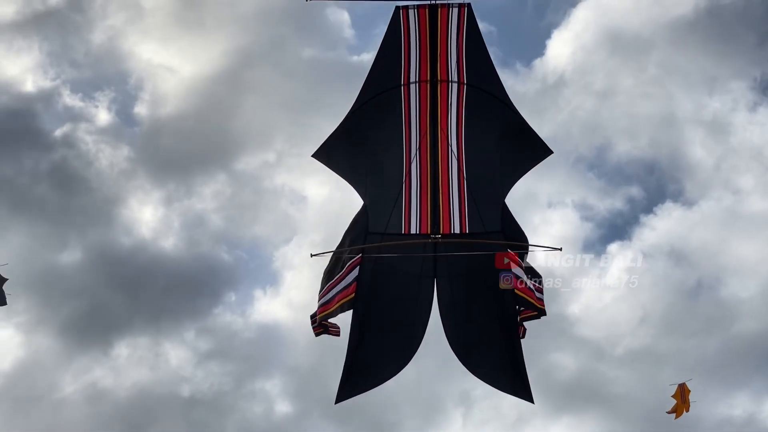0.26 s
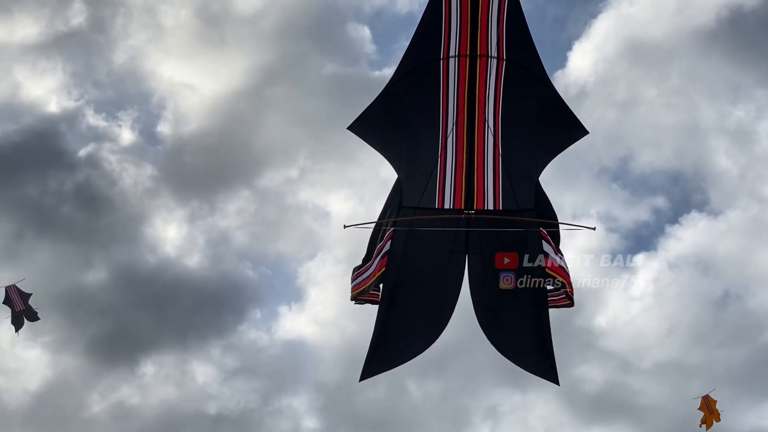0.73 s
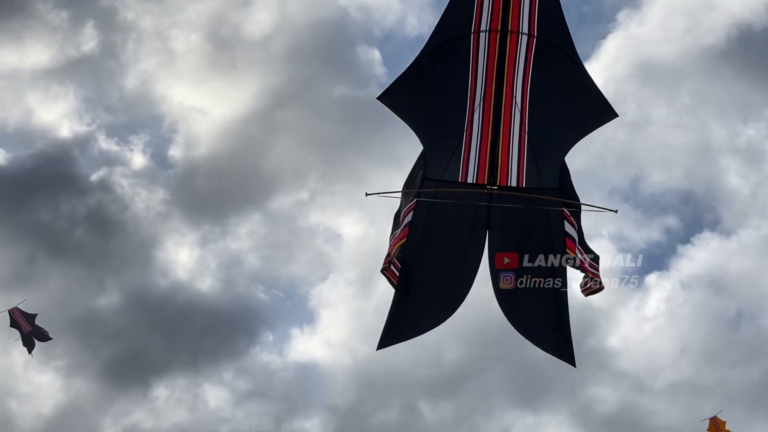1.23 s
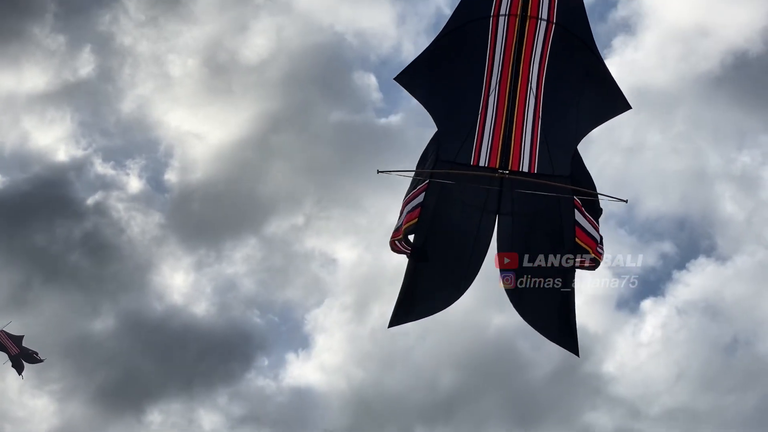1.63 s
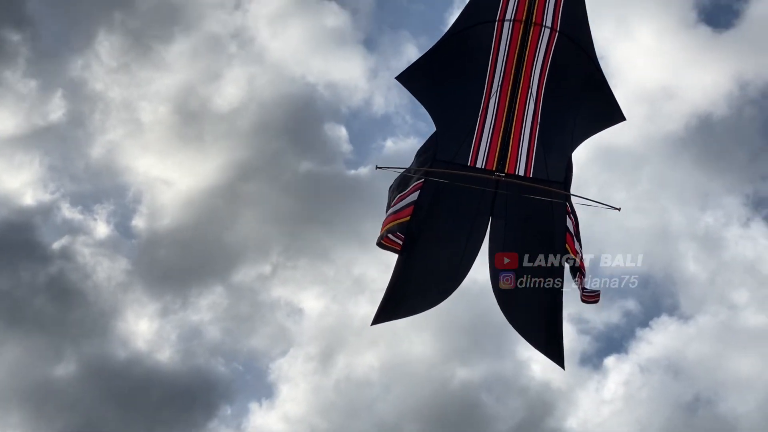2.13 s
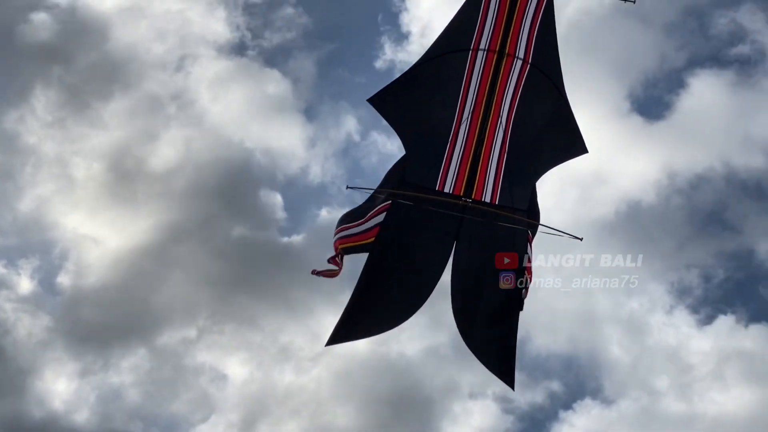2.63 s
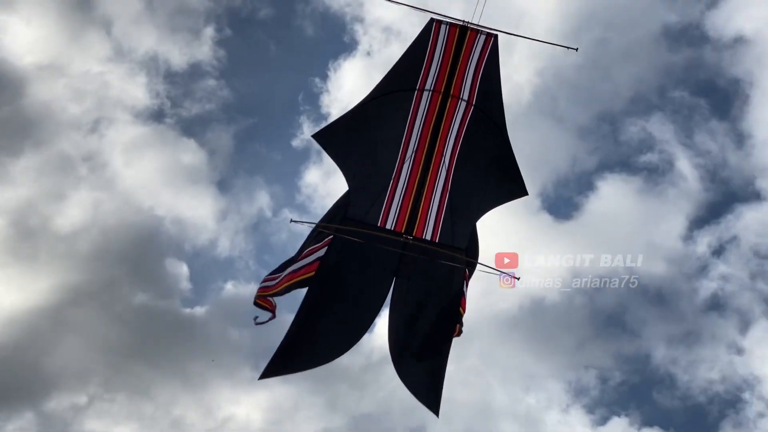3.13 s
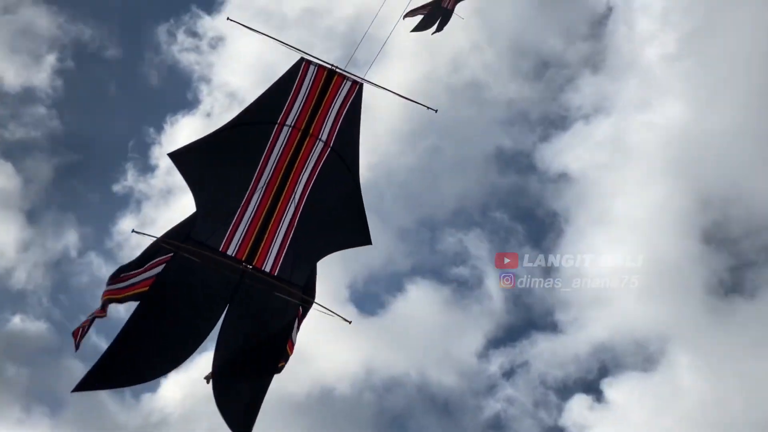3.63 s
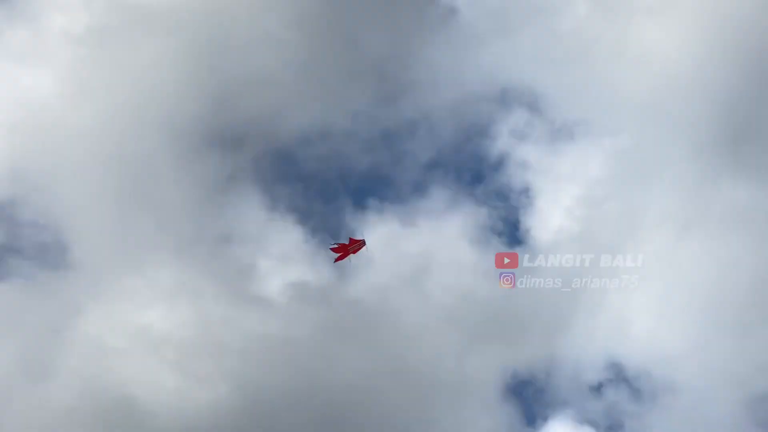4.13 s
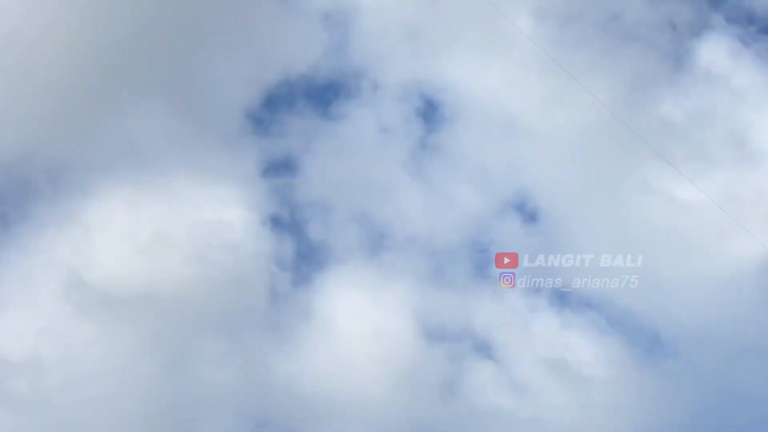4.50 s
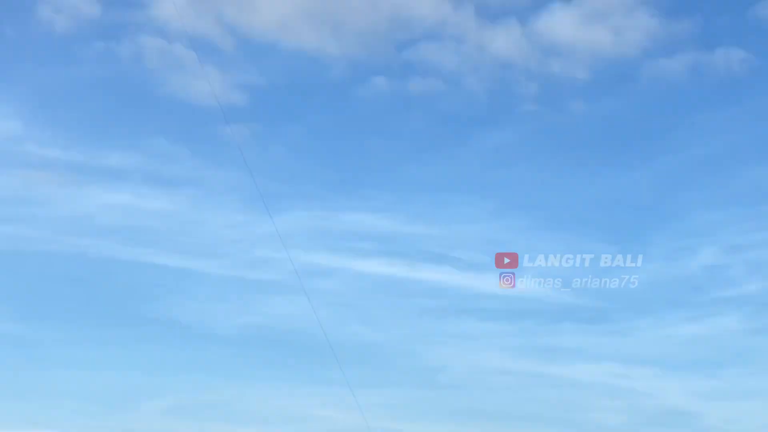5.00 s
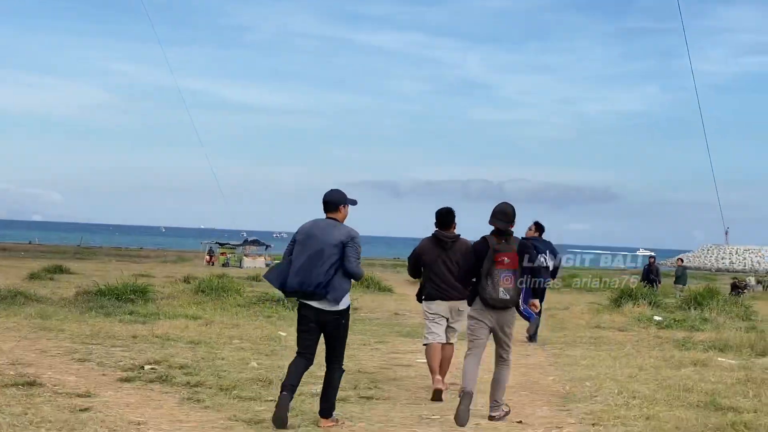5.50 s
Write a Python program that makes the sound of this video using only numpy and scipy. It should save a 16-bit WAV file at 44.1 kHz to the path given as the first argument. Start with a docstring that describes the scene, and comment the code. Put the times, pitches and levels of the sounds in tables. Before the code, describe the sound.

Strong wind rushes across an open field and buffets the microphone, with a few brief low hums in the rumble. Overhead, a large kite's two vibrating ribbons drone with a fast flutter, swelling, rising in pitch, then holding. Its cloth adds soft rustles, flaps and small crisp cracks, busiest in the first half. Near the end the higher buzz drops away as a lower, faster throb and a faint, distant rising tone appear.

```python
"""Two ribbon-strung bows on a large kite, overhead in strong wind. Each ribbon swings about 14 times
a second and sheds a short vortex tone on every forward and return stroke; the bows drift against
each other. The sail rustles, flaps, snaps and crinkles. Wind rumbles and rushes over the field, with
brief low hums in it. A low throb and a thin far tone come up near the end."""
import sys
import numpy as np
from scipy import signal
from scipy.fft import rfft, irfft, next_fast_len
from scipy.io import wavfile
from scipy.ndimage import uniform_filter1d, map_coordinates

SR = 44100
rng = np.random.default_rng(int(sys.argv[2]) if len(sys.argv) > 2 else 0)


def int16_out(signal):
    """Quantize to a 16-bit WAV file."""
    q = np.round(np.clip(np.atleast_2d(signal).T, -1, 1) * 32767)
    wavfile.write(sys.argv[1], SR, q.astype(np.int16))


N = 253569
TIME_S = np.arange(N) / SR

FRONT_SWING_HZ, REAR_SWING_HZ = 14.19, 13.94
# Forward strokes. Each row: time in seconds, shed tone in Hz, relative level in dB.
FRONT_STROKES = [(0, 300.7, -19), (.41, 283, -18), (.82, 298, -15.5), (1.23, 309.7, -13.5),
                 (1.65, 296, -13.5), (1.9, 351, -13), (2.1, 383.5, -14), (2.36, 388.7, -15),
                 (2.65, 381, -15.5), (3.1, 381, -15.5), (3.7, 367, -15.5), (4.4, 364.4, -16),
                 (4.75, 374, -19), (5.15, 366, -28), (5.75, 331, -30)]
REAR_STROKES = [(0, 208.4, -20.5), (1.2, 216.4, -17), (1.9, 222, -19.5), (2.4, 209.7, -22.5),
                (3, 236.4, -24.5), (4.2, 246.6, -22), (4.8, 265, -25), (5.75, 275, -23)]
# Lag of the shedding behind a steady swing. Each row: time in seconds, lag in ms.
FRONT_LAG = [(0, 34.3), (.5, 34.4), (.8, 35.7), (1.1, 35.9), (1.6, 33.2), (2.3, 33.4), (2.9, 31.7),
             (3.35, 31.1), (4.4, 33.2), (5.75, 34.4)]
REAR_LAG = [(0, 49.5), (1.15, 54.2), (2.3, 54.2), (3.3, 50.4), (4.2, 53.5), (5, 52.5), (5.75, 49.5)]
# Front ribbon's bursts. Each row: time, forward width, return delay, all in seconds.
FRONT_BURSTS = [(0, 0.0035, -0.0013), (1.7, 0.0042, -0.00097), (2.0, 0.0047, 0.0025), (2.6, 0.006, -.001),
                (5.75, 0.0065, 0.0021)]
def bows():
    """Two swinging ribbons. Forward strokes are faster than returns, so higher and louder."""
    width_s, return_delay_s = curves(FRONT_BURSTS, swing_starts(FRONT_SWING_HZ))
    front_returns = return_strokes(FRONT_STROKES, start_hz=282, pitch_share=.49, mean_db=-20.5)
    rear_returns = return_strokes(REAR_STROKES, start_hz=209, pitch_share=.7, mean_db=-24.5)
    forward, forward_swell = strokes(FRONT_STROKES, FRONT_SWING_HZ, FRONT_LAG, delay_s=.0015,
                                     width_s=width_s, glide_per_s=7.1, bright_db=2, slip_cycles=.04)
    back, back_swell = strokes(front_returns, FRONT_SWING_HZ, FRONT_LAG, delay_s=return_delay_s,
                               width_s=.0056, glide_per_s=16, bright_db=-9, slip_cycles=.17,
                               offset_swings=.54)
    rear_forward, _ = strokes(REAR_STROKES, REAR_SWING_HZ, REAR_LAG, delay_s=.00063,
                              width_s=.0063, glide_per_s=1.3, bright_db=3.5, slip_cycles=.0045)
    rear_back, _ = strokes(rear_returns, REAR_SWING_HZ, REAR_LAG, delay_s=.00072, width_s=.004,
                           glide_per_s=.82, bright_db=-10, slip_cycles=.012, offset_swings=-.5)
    front = (forward - back) * stereo_gain(.3, -.3)  # the return sheds in the opposite sense
    rear = (rear_forward + rear_back) * stereo_gain(-.3, .3)
    return front + rear + torn_air(forward_swell, back_swell)


def swing_starts(swing_hz):
    """Column of swing start times in seconds."""
    return np.arange(int(N / SR * swing_hz) + 2)[:, None] / swing_hz


def return_strokes(forward, start_hz, pitch_share, mean_db):
    """Return stroke rows, following the forward stroke's changes of pitch and level."""
    s, hz, db = np.transpose(forward)
    return np.transpose([s, start_hz + pitch_share * (hz - hz[0]), mean_db + db - db.mean()])


PITCH_SCATTER, LEVEL_SCATTER_DB, TIMING_SCATTER_S = .008, .7, .001
TWELFTH_DB, OVERTONE_FADE_DB_PER_S = -15.5, 903
# Edge of the ribbons' sound. Each row: time in seconds, relative octave and rasp levels in dB.
RIBBON_BITE = [(0, -28.5, -43.5), (.8, -19.5, -56), (1.1, -13, -48), (1.3, -14, -47.5), (1.8, -20, -51.5),
               (2.0, -14.5, -45), (2.35, -18, -46), (2.6, -22, -49.5), (4.3, -25, -52), (5.75, -27, -54.5)]
def strokes(rows, swing_hz, lag, delay_s, width_s, glide_per_s, bright_db, slip_cycles, offset_swings=0):
    """One vortex burst a swing, swelling and gliding with ribbon speed. Returns sound and envelope."""
    start_s = swing_starts(swing_hz)
    hz, db = curves(rows, start_s)
    octave_db, _ = curves(RIBBON_BITE, start_s)
    centre_s = start_s + curves(lag, start_s)[0] / 1000 + offset_swings / swing_hz
    timing, pitch, size, slip, colour_db = rng.standard_normal((len(start_s), 5, 1)).transpose(1, 0, 2)
    t = np.arange(-1500, 1500) / SR
    stroke_hz = hz * (1 + PITCH_SCATTER * pitch)
    phase = 2 * np.pi * (stroke_hz * (t + glide_per_s * t ** 2 / 2) + slip_cycles * slip)
    shape = np.hanning(len(t)) * gaussian(t - delay_s - TIMING_SCATTER_S * timing, width_s)
    swell = amp(LEVEL_SCATTER_DB * size) * shape
    flicker = unit(signal.lfilter(*signal.butter(4, 250, fs=SR), rng.standard_normal(phase.shape)))
    overtones = np.sin(2 * phase + 1) + amp(TWELFTH_DB) * np.sin(3 * phase + 2)
    overtone_db = octave_db + bright_db + colour_db + 2 * np.tanh(flicker) - OVERTONE_FADE_DB_PER_S * t
    tone = np.sin(phase) + amp(overtone_db) * overtones
    onset_s = centre_s[:, 0] + t[0]
    return place(amp(db + 2) * swell * tone, onset_s), place(swell, onset_s)


TEAR_DB, TEAR_LEAD_S = -25, .0026
# Torn air. Each row: frequency in Hz, relative density in dB.
TEAR_SPECTRUM = [(380, -39.5), (520, -2), (760, 1.5), (950, -8), (1200, -29), (2000, -120)]
def torn_air(forward_swell, back_swell):
    """The front ribbon tears the air: a rasp going forward, a lower noise just ahead of each tone."""
    _, rasp_db = curves(RIBBON_BITE, TIME_S)
    _, stroke_db = curves(FRONT_STROKES, TIME_S)
    rasp = amp(rasp_db) * forward_swell ** 1.5 * noise(RUSTLE_SPECTRUM, patchy_db=4)
    early_swell = np.interp(TIME_S + TEAR_LEAD_S, TIME_S, forward_swell + .55 * back_swell)
    return rasp + amp(stroke_db + TEAR_DB) * early_swell * noise(TEAR_SPECTRUM, patchy_db=3.5)


RUSTLE_DB, HISS_DB = -50, -65
# Cloth noise; the rustle also colours the ribbon's rasp. Each row: Hz, relative density in dB.
RUSTLE_SPECTRUM = [(590, -20.5), (1000, 4.5), (1240, 4), (1660, 4.5), (2290, 1), (3050, -12.5), (3960, -41),
                   (6710, -120)]
HISS_SPECTRUM = [(2200, -21), (3000, -4.5), (3400, -2.5), (5000, -8), (6500, -16.5), (7800, -25),
                 (8400, -43.5), (9000, -78.5), (17000, -120)]
# Gusts on the sail. Each row: centre in seconds, width in seconds, rustle boost in dB.
SAIL_GUSTS = [(0.98, 0.02, 4.5), (1.233, 0.032, 9), (1.396, .03, 3.5), (1.998, 0.05, 3), (2.201, 0.03, 3.5),
              (2.31, 0.015, 6.5), (2.383, 0.016, 7.5), (2.484, 0.01, 5), (2.676, 0.0237, 8),
              (2.962, .03, 5.5), (4.299, 0.18, 2), (5.062, 0.063, 4)]
def sail_rustle():
    """The cloth rustles and hisses in shared quick flurries, and swells in short gusts."""
    gust_db = sum(db * gaussian(TIME_S - s, width_s) for s, width_s, db in SAIL_GUSTS)
    flurry_db = .5 * wobble(25) + 1.3 * wobble(160)
    rustle = unit(amp(flurry_db) * noise(RUSTLE_SPECTRUM, patchy_db=1.5))
    hiss = unit(amp(.76 * flurry_db) * noise(HISS_SPECTRUM, patchy_db=1.5))
    return amp(RUSTLE_DB + gust_db) * rustle + amp(HISS_DB + .59 * gust_db) * hiss


FLAP_HZ, FLAP_RISE_S, FLAP_T60_S = 1700, .002, .04
# Side cloth flaps. Each row: time in seconds, relative level in dB.
CLOTH_FLAPS = [(.143, -35.5), (0.21, -39), (0.327, -39), (.52, -35.5), (.693, -31.5), (0.9658, -31),
               (1.232, -29), (1.286, -33), (1.3872, -35), (1.5536, -33), (1.8903, -23), (1.9784, -33),
               (2.128, -41.5), (2.2855, -32.5), (2.366, -35), (2.484, -31.5), (2.6698, -33.5), (2.701, -37),
               (2.736, -32.5), (2.9437, -25), (3.0459, -32.5), (3.7247, -38), (4.528, -32.5), (5.0502, -41),
               (5.0926, -36)]
def sail_flaps():
    """The side cloth whips over: soft puffs of rustle, partly different in each channel."""
    puffs = np.zeros((2, N))
    t = np.arange(SR // 8) / SR
    for s, db in CLOTH_FLAPS:
        envelope = amp(db - 3.5 - 60 * t / FLAP_T60_S) * (1 - np.exp(-t / FLAP_RISE_S))
        common = band(FLAP_HZ, q=.91, size=len(t))
        for channel in puffs:
            puff = common + .6 * band(FLAP_HZ, q=.82, size=len(t))
            channel += place([envelope * puff], [s - FLAP_RISE_S])
    return filtered(puffs, lambda hz: lowpass(hz, 3000, 6) / (1 + (650 / (hz + 1)) ** 4))


TICKS_PER_S, TICK_DB, TICK_HZ, TICK_T60_S = 9, -69, 4800, .015
CRACK_RISE_S, SNAP_TOP_HZ = .0011, 10500
# Short cracks. Each row: start in seconds, relative level in dB, band centre in Hz, T60 in seconds.
EDGE_SNAPS = [(.111, -58, 5800, .015), (.21, -50.5, 4200, 0.016), (.418, -46.5, 3000, 0.033),
              (.535, -46.5, 3000, 0.02), (.536, -65, 6000, .02), (.596, -53, 3580, 0.017),
              (.637, -55, 5960, .02), (.834, -55, 5030, 0.066), (.874, -46, 5770, 0.011),
              (.889, -42, 5900, 0.008), (1.025, -56, 6040, 0.014), (1.188, -61, 5050, 0.015),
              (1.197, -47, 2500, 0.019), (1.242, -42, 5850, 0.023), (1.291, -51, 5960, 0.014),
              (1.33, -52.5, 4880, 0.023), (1.413, -50, 2770, 0.013), (1.506, -53.5, 5300, 0.026),
              (1.878, -54, 9100, 0.015), (1.797, -37.5, 5860, 0.024), (1.885, -50, 2300, .012),
              (1.888, -36, 5400, 0.0089), (1.892, -44.5, 6450, 0.038), (1.92, -45.5, 6300, 0.016),
              (2.699, -52, 5200, 0.023), (3.103, -43, 4400, 0.017), (3.182, -53.5, 5170, .02),
              (3.259, -55, 5170, .03), (3.771, -55, 5000, .02), (4.11, -53, 2400, 0.025),
              (4.17, -45.5, 5280, 0.023), (4.17, -49, 9500, .015), (4.434, -55, 4670, 0.042),
              (4.522, -51, 5430, 0.018), (4.652, -43, 3300, 0.014)]
TOP_SIZZLES = [(.906, -63, 14200, 0.047), (1.023, -71, 13800, .03), (1.051, -69, 14400, .03),
               (1.074, -66, 14300, .035), (1.132, -71, 13500, .03), (1.243, -70, 13300, .04),
               (1.3, -72, 14000, .03), (1.505, -64, 14500, .03), (1.562, -76, 14900, 0.053),
               (1.797, -61, 12800, .025), (1.877, -70, 12500, 0.017), (1.892, -64, 12800, .03),
               (2.523, -65, 14900, .07), (2.563, -64, 14900, 0.054), (2.602, -62, 14800, 0.044),
               (2.63, -63, 14400, .03), (2.67, -68, 13100, 0.037), (2.692, -67, 15300, .05),
               (2.778, -64, 13000, 0.025), (4.169, -73, 12500, 0.029)]
LEFT_CHINKS = [(2.52, -56, 7900, 0.083), (2.523, -69, 8800, .04), (2.603, -52, 8850, 0.024),
               (2.668, -62, 7950, 0.055), (2.777, -64, 9940, .02)]
def sail_snaps():
    """A loose edge cracks taut, among random ticks, crisp sizzles and thin chinks on the left."""
    draws = rng.random((int(TICKS_PER_S * N / SR), 3))
    ticks = [(when * N / SR, TICK_DB + 12 * size, TICK_HZ * (.73 + .84 * pitch), TICK_T60_S)
             for when, size, pitch in draws]
    cloth = cracks(EDGE_SNAPS + ticks, q=3, body_db=2, body_hz=3200)
    cloth = filtered(cloth, lambda hz: lowpass(hz, SNAP_TOP_HZ, 6))
    sizzles = cracks(TOP_SIZZLES, q=20, body_db=-4, body_hz=9800)
    chinks = cracks(LEFT_CHINKS, q=14, body_db=-23, body_hz=11000)
    return cloth + sizzles + chinks * stereo_gain(4, -12)


def cracks(rows, q, body_db, body_hz):
    """Decaying noise in a band at each row's pitch, plus a broad body."""
    out = np.zeros(N)
    t = np.arange(SR // 10) / SR
    for s, db, hz, t60_s in rows:
        envelope = amp(-60 * t / t60_s) * (1 - np.exp(-t / CRACK_RISE_S))
        burst = band(hz, q, size=len(t)) + amp(body_db) * band(body_hz, q=.86, size=len(t))
        out += place([amp(db - 9) * envelope / envelope.max() * burst], [s])
    return out


# Crinkle colour. Each row: frequency in Hz, relative density in dB.
CRINKLE_SPECTRUM = [(8000, -59), (8800, -0.5), (9800, 2), (11000, -4.5), (11500, -19), (12600, -27),
                    (13000, -61), (14000, -120)]
# Crinkle flurries. Each row: time in seconds, level in dB.
CRINKLE_LEVELS = [(0, -100), (.8, -98), (1, -85.5), (1.35, -88), (1.6, -98.5), (1.93, -80), (2.05, -100),
                  (2.5, -99), (2.63, -85), (2.75, -86), (2.9, -102), (4.1, -93), (5.75, -96.5)]
def crinkle():
    """Faint, spiky crinkling in the top treble."""
    level_db = curves(CRINKLE_LEVELS, TIME_S)[0]
    spikes = amp(2.5 * wobble(30) + 2.5 * wobble(200))
    return amp(level_db) * unit(spikes * noise(CRINKLE_SPECTRUM, patchy_db=3))


# Wind strength. Each row: time in seconds, rumble in dB, rush in dB.
WIND_LEVELS = [(0, -33.5, -20.5), (.6, -29.5, -25.5), (.95, -26, -23), (1.35, -23.5, -23.5),
               (1.41, -35, -27.5), (1.5, -35, -23), (1.56, -26.5, -25.5), (2.05, -30.5, -22.5),
               (2.25, -31, -24), (2.5, -32.5, -23), (2.74, -22.5, -24.5), (2.92, -28, -26),
               (3.36, -26.5, -24), (3.45, -28.5, -27.5), (4.02, -25, -24.5), (4.3, -28, -25),
               (5, -28.5, -27.5), (5.75, -32.5, -28.5)]
# Wind colour. Each row: frequency in Hz, relative density in dB.
RUMBLE_SPECTRUM = [(13, -46), (22, -20.5), (54, 5), (166, 2.5), (200, -3), (260, -31), (440, -120)]
RUSH_SPECTRUM = [(90, -17), (140, -12), (200, -8), (300, -1), (380, -4), (480, -12), (760, -18),
                 (950, -25.5), (1200, -54), (1600, -80), (3000, -140)]
def wind():
    """Low buffeting under a broad rush."""
    rumble_db, rush_db = curves(WIND_LEVELS, TIME_S)
    rumble = unit(amp(.2 * wobble(11)) * noise(RUMBLE_SPECTRUM, patchy_db=1.5))
    rush = amp(.23 * wobble(4.7)) * noise(RUSH_SPECTRUM, patchy_db=2)
    return amp(rumble_db) * rumble + amp(rush_db) * rush


HUM_SAG_PER_S = .021
# Hums in the rumble. Each row: centre in seconds, half length in seconds, pitch in Hz, level in dB.
LOW_HUMS = [(1.194, 0.17, 56.3, -29.5), (2.33, 0.22, 123.7, -30), (4.058, 0.055, 62.8, -29),
            (4.918, 0.14, 119, -39.5)]
def low_hums():
    """Fuzzy low tones swell, sag in pitch and fade."""
    fuzz = 1.6 + wobble(16) + 1j * wobble(16)
    out = np.zeros(N)
    for centre_s, half_s, hz, db in LOW_HUMS:
        t = TIME_S - centre_s
        tone = np.exp(2j * np.pi * hz * (t - HUM_SAG_PER_S * t ** 2 / 2))
        swell = np.exp(-(t / half_s) ** 4 / 2)
        out += amp(db) * swell * unit((fuzz * tone).real)
    return out


THROB_RATE_HZ, THROB_LAG_MS = 21.4, 5.6
# Throb beats. Each row: time in seconds, pitch in Hz, relative level in dB.
THROB_BEATS = [(0, 161.7, -67.5), (4.7, 158.7, -61), (5.1, 154.6, -21.5), (5.4, 154, -21.5),
               (5.75, 171, -23.5)]
def throb():
    """A beat, deeper and faster than the bows, comes up near the end."""
    return strokes(THROB_BEATS, THROB_RATE_HZ, [(0, THROB_LAG_MS)], delay_s=0,
                   width_s=.004, glide_per_s=0, bright_db=-23, slip_cycles=.037)[0]


def far_tone(start_s=4.8, from_hz=1320, toward_hz=1650, settle_s=.55, fade_in_s=.1):
    """A thin, unsteady tone on the left climbs and levels off."""
    since_s = np.clip(TIME_S - start_s, 0, None)
    hz = toward_hz - (toward_hz - from_hz) * np.exp(-since_s / settle_s)
    tone = np.sin(2 * np.pi * np.cumsum(hz + 3 * wobble(30)) / SR)
    envelope = (1 - np.exp(-since_s / fade_in_s)) * amp(1.5 * wobble(17))
    return envelope * tone * stereo_gain(-57, -65)


# Stereo likeness of the noise. Each row: frequency in Hz, left-right correlation.
NOISE_CORRELATION = [(60, 0.78), (110, 1), (210, 0.84), (390, 0.99), (740, 0.34), (1390, 0.27),
                     (2600, 0.97)]
def noise(spectrum, patchy_db):
    """Stereo noise at rms 1, with random gain patches in time and frequency."""
    def mid_side_gains(hz):
        angle = np.arccos(np.clip(along(NOISE_CORRELATION, hz), -1, 1)) / 2
        return amp(along(spectrum, hz)) * [np.cos(angle), np.sin(angle)]

    bins = signal.stft(rng.standard_normal((2, N + 512)), nperseg=512)[2]
    patches = uniform_filter1d(rng.standard_normal(bins.shape[1:]), size=6, axis=0)
    patches = uniform_filter1d(patches, size=8, axis=1)
    pair = signal.istft(bins * amp(patchy_db * unit(patches)), nperseg=512)[1][:, :N]
    mid, side = filtered(pair, mid_side_gains)
    return unit(np.array([mid + side, mid - side]))


def band(hz, q, size):
    """Noise around hz at rms 1."""
    peak = signal.iirpeak(hz, q, SR)
    return unit(signal.lfilter(*peak, signal.lfilter(*peak, rng.standard_normal(size))))


def wobble(rate_hz):
    """Smooth random curve, rate_hz knots a second."""
    knots = rng.standard_normal(int(N * rate_hz / SR) + 4)
    return map_coordinates(knots, [TIME_S * rate_hz])


def place(sounds, starts_s):
    """Sum of short sounds, each at its start time."""
    sounds = np.asarray(sounds)
    at = np.round(np.asarray(starts_s) * SR).astype(int)[:, None] + np.arange(sounds.shape[1])
    inside = (at >= 0) & (at < N)
    return np.bincount(at[inside], sounds[inside], N)


def filtered(x, response):
    """x through a complex frequency response."""
    size = next_fast_len(N + SR // 2)
    return irfft(rfft(x, size) * response(np.fft.rfftfreq(size, 1 / SR)), size)[..., :N]


def curves(rows, s):
    """Each column after the time, interpolated at times s."""
    knots, *columns = np.transpose(rows)
    return [np.interp(s, knots, column) for column in columns]


def along(points, hz):
    """(Hz, value) points interpolated on a log axis."""
    knots_hz, values = np.transpose(points)
    return np.interp(np.log(hz + 1), np.log(knots_hz + 1), values)


def lowpass(hz, corner_hz, order):
    return 1 / (1 + (hz / corner_hz) ** order)


def gaussian(t, width_s):
    return np.exp(-(t / width_s) ** 2 / 2)


def amp(db):
    return 10 ** (np.asarray(db) / 20)


def stereo_gain(left_db, right_db):
    return amp([[left_db], [right_db]])


def unit(x):
    """x at rms 1."""
    return x / np.sqrt(np.mean(x ** 2) + 1e-20)


def scene():
    """Kite and wind in the open air, no walls."""
    return (bows() + wind() + low_hums() + sail_rustle() + sail_flaps() + sail_snaps()
            + far_tone() + throb() + crinkle())


WHINE_HZ, WHINE_DB, TOP_HZ, END_FADE_S = 12000, -66.5, 15800, .004
# Microphone balance. Each row: frequency in Hz, left minus right in dB.
MIC_BALANCE = [(60, 0.5), (140, -0.5), (320, -3.5), (740, -1.5), (1130, -1.5), (2000, 0.5), (6000, 0),
               (9000, -6)]
# Microphone phase. Each row: frequency in Hz, left lead in radians.
MIC_PHASE = [(500, 0), (690, -.2), (950, 1), (1290, 0), (1890, -.3), (2760, 0)]
def record(dry):
    """Two band-limited microphones, unlike in colour and phase; a faint whine rides on the sound."""
    def microphones(hz):
        split = np.array([[.5], [-.5]])
        gain = amp(split * along(MIC_BALANCE, hz)) * lowpass(hz, TOP_HZ, 80)
        return gain * np.exp(1j * split * along(MIC_PHASE, hz))

    whine = 1 + amp(WHINE_DB) * np.sin(2 * np.pi * WHINE_HZ * TIME_S)
    from_edge_s = np.minimum(TIME_S, TIME_S[::-1])
    fades = np.sin(np.pi / 2 * np.clip(from_edge_s / END_FADE_S, 0, 1)) ** 2
    return filtered(dry * whine * fades, microphones)


dry = scene()
out = record(dry)
int16_out(out)
```